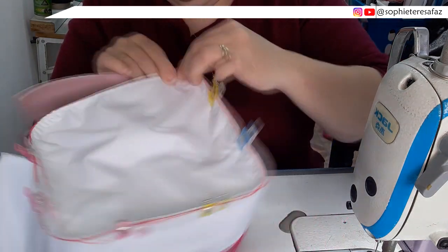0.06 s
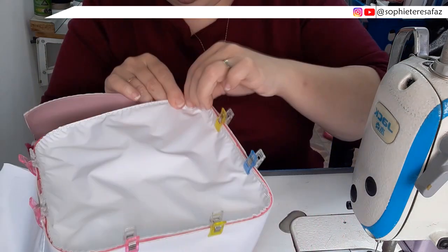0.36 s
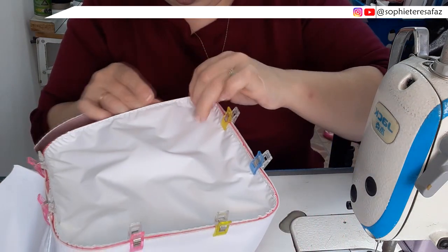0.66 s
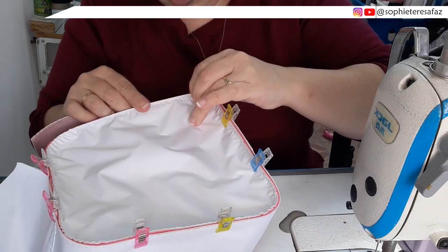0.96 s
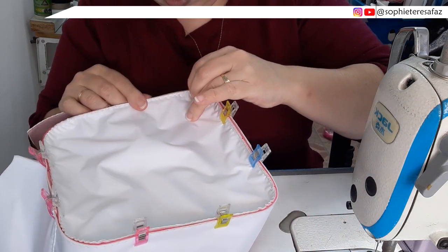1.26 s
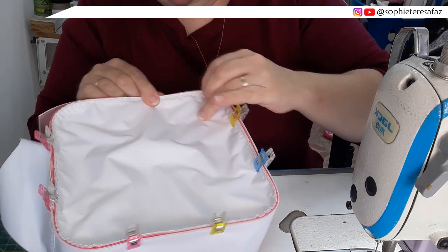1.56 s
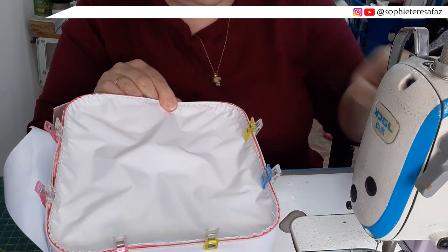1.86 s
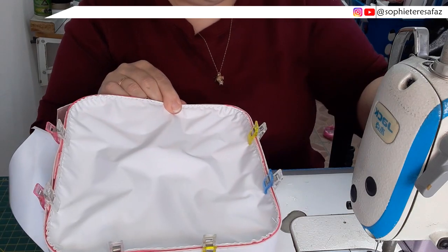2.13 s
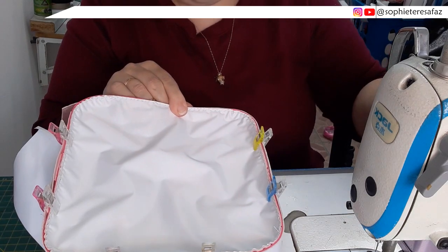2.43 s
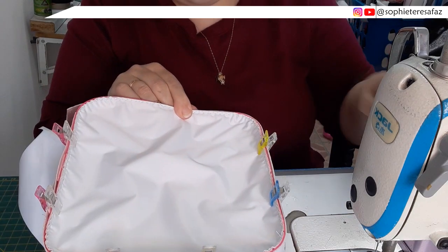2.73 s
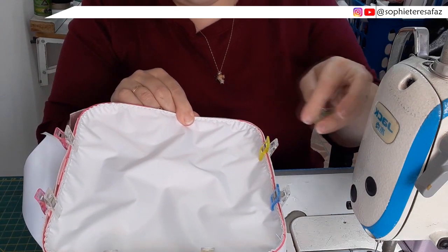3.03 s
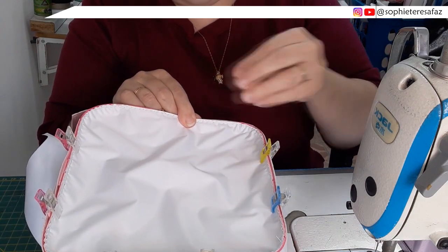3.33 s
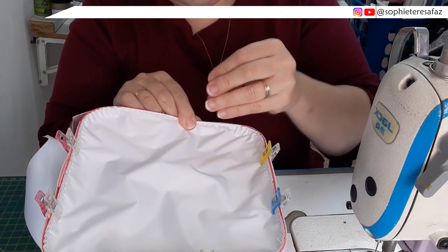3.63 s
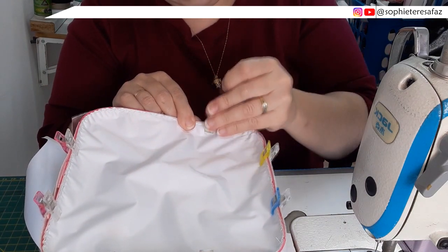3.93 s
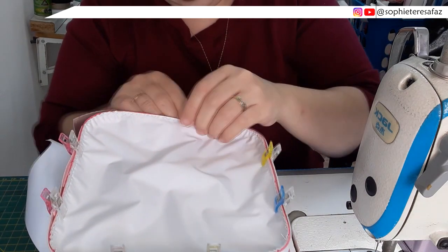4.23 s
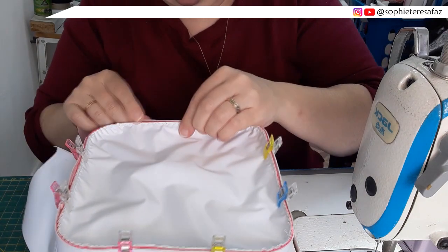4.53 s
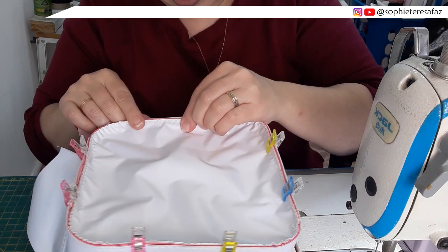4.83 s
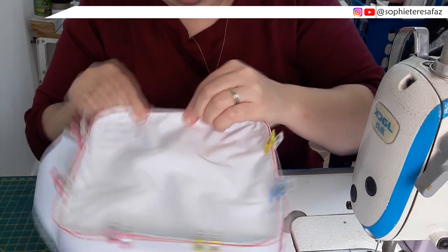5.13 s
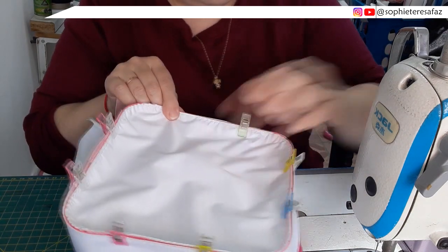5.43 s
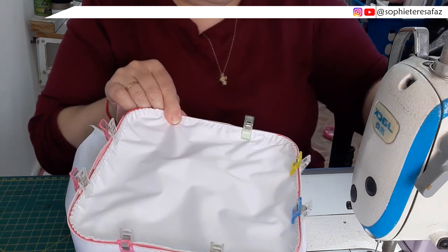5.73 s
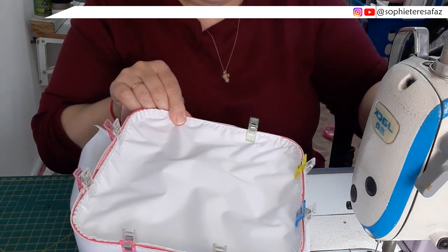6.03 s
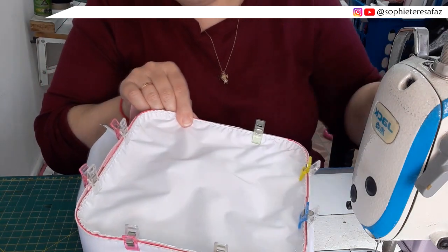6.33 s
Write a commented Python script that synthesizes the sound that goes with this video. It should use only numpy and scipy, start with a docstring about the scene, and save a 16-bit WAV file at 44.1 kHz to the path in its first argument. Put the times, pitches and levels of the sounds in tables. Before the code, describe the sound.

Stiff synthetic lining is pushed into a bag, starting with a loud crinkle and a cluster of sharp snaps in the first 0.3 seconds as taut panels flip over. Softer sliding, small crackles and dull finger scuffs continue until about 2 seconds. From 2 to 2.6 seconds a hand rummages in a tub of small plastic clips, making light, dry clicks and rattles. Faint rubbing follows, then more rustles and scuffs from about 4 seconds, growing into a crinkly flurry between 5.1 and 5.4 seconds. The clips rattle again from 5.6 to about 6.3 seconds. Underneath runs a low room rumble with a few soft swelling drones and a faint hum, a little stronger between 1 and 3 seconds. The workshop is small, with a brief ring. The stereo microphone is near the work, and everything sits slightly to the right.

```python
"""Lining a bag at the sewing table

A small workshop, with a stereo microphone near the work and everything a little to its right. Stiff synthetic
lining is pushed into a bag: the cloth slides and crinkles, taut panels snap over, and early on a couple of
clips knock on the table. Twice a hand rummages at the side, most likely in a tub of small plastic sewing clips.
The room answers briefly, over a low rumble, a few swelling low notes and a faint hum."""
import sys
import numpy as np
from scipy import signal
from scipy.fft import rfft, irfft
from scipy.io import wavfile
from scipy.ndimage import uniform_filter1d

SR = 44100
rng = np.random.default_rng(int(sys.argv[2]) if len(sys.argv) > 2 else 0)


def digitize_waveform(pressure):
    """Quantize a signal to 16-bit integers and store it at the path in sys.argv[1].

    Rows of a 2-D input are taken as channels; values are limited to [-1, 1].
    """
    field = np.atleast_2d(pressure).T
    bounded = np.clip(field, -1, 1)
    quanta = np.round(bounded * 32767).astype(np.int16)
    wavfile.write(sys.argv[1], SR, quanta)


N = 281358
TIME = np.arange(N) / SR

# Likeness of the microphone's two ports. Each row: frequency in Hz, correlation.
PORT_CORRELATION = [(60, 1), (200, 0.97), (400, 0.64), (800, 0.54), (1500, 0.082), (3000, 0.0067),
                    (16000, 0)]
# The workshop's ring. Each row: frequency in Hz, seconds to die away by 60 dB.
WORKSHOP_T60 = [(200, 0.72), (530, 0.33), (1400, 0.26), (3700, 0.24), (9700, 0.24), (16000, 0.2)]

# Colours of the room tone. Each row: frequency in Hz, relative level in dB.
RUMBLE_COLOUR = [(20, -38), (34, -9.5), (48, -2.5), (70, -7.5), (86, 1), (105, -2.5), (135, -1),
                 (165, -4.5), (205, -3.5), (255, -15.5), (330, -8), (450, -29.5), (1500, -52.5)]
AIR_COLOUR = [(30, -10.5), (200, 1.5), (360, 1.5), (500, -3), (750, -7), (1100, -20.5), (1550, -17),
              (2200, -27), (4000, -31), (7000, -40), (9000, -25), (10500, -32.5), (16000, -35)]
# How rumble and hum swell and ease. Each row: time in seconds, relative level in dB.
RUMBLE_CURVE = [(0, -57.5), (2.3, -54), (3.8, -58.5), (4.9, -57), (5.7, -53.5), (6.38, -54.5)]
HUM_CURVE = [(0, -69), (.55, -67.5), (1.1, -55.5), (2.27, -52.5), (2.45, -59), (2.85, -55.5), (3.3, -68.5),
             (6.38, -65)]
# Lines of the hum. Each row: pitch in Hz, waver in Hz, relative level in dB.
HUM_LINES = [(53.2, 2.1, 0), (367, 4, -22), (585, 3.4, -23.5)]

# Cloth drawn over cloth. Each row: peak time and length in seconds, relative rub level in dB,
# then the rustle of the folds and the fizz of the weave as offsets from it in dB.
CLOTH_STROKES = [(.005, 0.1, -48, 1.5, 1), (0.094, 0.086, -55, 1, -14), (0.233, 0.076, -51, 2.5, -5),
                 (.33, 0.18, -65, -3.5, -7.5), (0.5, 0.13, -70.5, -6, -7), (0.573, 0.21, -82.5, 5, 11),
                 (.71, 0.028, -71, 5, 9), (0.758, .12, -64.5, -1.5, -7), (0.985, .2, -80, -16, -11),
                 (1.144, 0.028, -76.5, -11, -2.5), (1.19, 0.21, -71, -17, -8),
                 (1.255, 0.18, -70.5, -7, -12), (1.44, 0.48, -73, -5.5, -8.5), (1.611, 0.12, -67, 4.5, 0),
                 (1.885, 0.19, -72.5, -9, -7), (2.677, 0.057, -73, -5, 1.5), (2.76, 0.68, -74, -10.5, -8.5),
                 (3.2, 0.44, -91, -6, -2), (3.502, .1, -84, -7.5, -2.5), (3.682, 0.073, -80, -9, -4),
                 (3.883, 0.046, -78, 0.5, 4), (3.982, 0.12, -67, -5, -2.5), (4.097, 0.18, -71, -5, -3),
                 (4.192, 0.15, -71, -3.5, 2.5), (4.36, .12, -66.5, -2.5, 1.5), (4.644, 0.26, -71, -7, -6),
                 (4.84, 0.56, -77.5, -11, -6), (5.146, 0.12, -62, 4, 3.5), (5.206, 0.087, -63.5, 1, -0.5),
                 (5.299, 0.075, -62.5, 2.5, -0.5), (5.37, 0.14, -59.5, -2, -3.5),
                 (5.61, 0.25, -70.5, -10, -5)]
# A seam zipping over the weave. Each row: peak time and length in seconds, relative level in dB.
SEAM_ZIPS = [(.113, 0.013, -60.5), (0.124, 0.011, -48.5)]
# Fingers dragging on the bag. Each row: peak time and length in seconds, relative level in dB.
FINGER_PRESSES = [(.01, 0.21, -52), (.235, 0.098, -50), (0.472, 0.11, -59), (0.79, 0.1, -61),
                  (1.207, 0.15, -60.5), (1.32, 0.088, -56), (1.553, 0.29, -61.5), (1.9, .25, -70.5),
                  (2.3, 0.29, -60), (2.78, 0.28, -62), (3.12, 0.19, -69.5), (4.008, .1, -52),
                  (4.18, 0.092, -53.5), (4.348, .12, -61.5), (4.62, 0.58, -70.5), (5.117, 0.12, -49),
                  (5.341, 0.12, -48)]
# Sharp clicks: mostly panels snapping, but the loud ones near 0.21 s and 0.23 s are clips knocking on the
# table. # Each row: time in seconds, relative strength in dB, the thud's offset in dB.
SNAPS = [(.0092, -8.5, -6), (0.025, -18.5, 6.5), (0.0932, -19.5, -13), (0.206, -3.5, -14),
         (0.213, -17, 9.5), (0.2313, -6, -2.5), (.2375, -14, 0), (.244, -12, -6), (.251, -14, -21),
         (0.264, -11.5, -22), (0.696, -30.5, -14), (0.735, -31, -15), (1.5853, -29, 1),
         (3.979, -36.5, 17.5), (4.0179, -26, -2), (4.208, -34, -9), (5.138, -37, 8), (5.345, -26, 2)]
# The panel's resonances. Each row: frequency and width in Hz, strength in dB against its colour.
PANEL_RESONANCES = [(1260, 240, 4), (2018, 151, -1.5), (2540, 230, 0), (3380, 260, 4.5), (5050, 400, -8.5)]
# Colours of lining and bag. Each row: frequency in Hz, relative level in dB.
RUB_COLOUR = [(150, -33), (500, 4), (750, 6), (950, 2), (1300, 3), (2000, -2), (3000, -8.5), (5000, -31.5),
              (16000, -61)]
FOLD_COLOUR = [(600, -8), (1800, 6), (2600, 6), (3500, 4), (5000, -3), (6500, -7), (10000, -19.5),
               (16000, -42)]
WEAVE_COLOUR = [(1000, -25), (3500, -38), (5500, 4.5), (7500, 5), (9000, 9.5), (10200, 3), (13000, 6),
                (16000, -1)]
SEAM_COLOUR = [(2000, -30), (8000, -12.5), (9500, 1.5), (11000, 0), (13500, -0.5), (16000, -3)]
SCUFF_COLOUR = [(100, -38.5), (250, -10), (360, 0), (560, -4.5), (720, -8.5), (950, -27.5), (2000, -33),
                (8000, -59.5)]
PANEL_COLOUR = [(100, -22), (300, -6.5), (650, 2), (1000, 1.5), (3000, -0.5), (5000, -0.5), (7000, -6.5),
                (10000, -13.5), (13000, -10.5), (16000, -19.5)]
THUD_COLOUR = [(60, -5), (170, -10.5), (260, 0), (350, 8), (470, -5.5), (660, 2.5), (950, -21.5),
               (3000, -40), (9000, -66)]

# Notes in the rumble. Each row: peak time and length in seconds, pitch in Hz, relative level in dB.
LOW_NOTES = [(0.402, .4, 205.2, -59.5), (0.867, 0.28, 205, -62.5), (1.21, 0.35, 205.8, -60),
             (1.68, 0.2, 206.7, -60), (2.4, 0.055, 88, -51.5), (2.597, .3, 171, -58.5),
             (4.49, 0.19, 134, -57.5), (5.603, 0.28, 172.8, -55.5), (6.24, 0.55, 84.5, -56.5)]

# The hand in the clips. Each row: start and length in seconds, relative level in dB, glint offset in dB.
CLIP_STIRS = [(2.008, 0.073, -57.5, 6), (2.048, 0.081, -43.5, -6), (2.119, 0.056, -41, -3.5),
              (2.207, 0.075, -46.5, -2.5), (2.3, 0.038, -48, -2), (2.357, 0.033, -50, -6),
              (2.464, 0.068, -43.5, -5.5), (5.656, 0.12, -45, -5), (5.803, 0.066, -50, -5.5),
              (5.896, 0.038, -50, -5.5), (5.946, 0.034, -58, -0.5), (6.043, 0.1, -54.5, -4),
              (6.127, 0.041, -52.5, -4), (6.187, 0.026, -43.5, -5), (6.25, 0.065, -70, -5)]
# A heap of clips tumbling. Each row: start in seconds, relative strength in dB, length in seconds,
# glint offset in dB.
CLIP_TUMBLES = [(2.035, -40, 0.012, 9), (2.063, -14.5, 0.018, 2), (2.072, -17, .014, 5.5),
                (2.137, -14.5, 0.017, 3), (2.165, -23, 0.0035, 4), (2.235, -18, 0.012, 0),
                (2.3116, -7.5, 0.0018, -3.5), (2.3675, -6, 0.012, -4.5), (2.4682, -6, 0.0033, -8),
                (2.472, -6.5, 0.0042, -3), (2.478, -8.5, .005, -8), (2.515, -10, 0.0094, -10),
                (2.528, -10.5, 0.01, 0), (5.626, -19, 0.014, -14), (5.6611, -6.5, 0.0099, 0),
                (5.686, -7.5, 0.011, -4.5), (5.742, -18, 0.0051, 1), (5.828, -22, 0.0051, 3),
                (5.842, -14, .008, -4), (5.881, -28.5, 0.0042, 11.5), (5.924, -15.5, .014, -7),
                (6.013, -20, 0.0033, -29), (6.048, -18.5, 0.0048, -10), (6.0877, -19, 0.014, 1),
                (6.139, -15, .008, -4), (6.1974, -8, .004, -9), (6.2055, -10.5, 0.0065, 2)]
# The tub's resonances. Each row: frequency and width in Hz, strength in dB against its colour.
TUB_RESONANCES = [(320, 55, 15.5), (1026, 150, 6.5), (1490, 38, -13), (1587, 130, 6), (1686, 99, 5),
                  (2150, 130, -1.5), (2420, 80, -9.5), (3480, 250, -1)]
# Colours of clip on tub and clip on clip. Each row: frequency in Hz, relative level in dB.
KNOCK_COLOUR = [(80, -13.5), (250, -10.5), (550, -6.5), (720, -1.5), (900, -0.5), (1300, -4), (2500, -1),
                (3600, -3.5), (4500, -8.5), (6500, -5.5), (10000, -19), (16000, -17)]
GLINT_COLOUR = [(500, -20), (2500, 1), (5000, -0.5), (7000, -4), (9000, 1.5), (10200, -2.5), (12000, 2),
                (13500, -2.5), (16000, -4)]


def amp(db):
    """Decibels to gain."""
    return 10 ** (np.asarray(db) / 20)


def unit(x):
    """Scales to rms 1."""
    return x / np.sqrt(np.mean(x ** 2) + 1e-20)


def value_at(points, hz):
    """Reads a curve on a log-frequency axis."""
    f, value = np.transpose(points)
    return np.interp(np.log(hz + 1), np.log(f + 1), value)


def level(curve):
    """Gain that follows a dB curve and is silent outside it."""
    s, db = np.transpose(curve)
    return uniform_filter1d(amp(np.interp(TIME, s, db)) * (TIME >= s[0]) * (TIME <= s[-1]), size=300)


def wander(pace_s):
    """Slow random drift with a new value every pace_s."""
    values = rng.standard_normal(1000)
    return np.interp(TIME / pace_s, np.arange(len(values)), values)


def convolve(x, response):
    """Filters each channel and keeps the scene's length."""
    return signal.oaconvolve(np.atleast_2d(x), np.atleast_2d(response), axes=1)[:, :N]


def colour(x, points, modes=(), size=8192):
    """Causal filter of energy 1: a broad spectrum with resonances standing on it."""
    hz = np.fft.rfftfreq(size, 1 / SR)
    peaks = 1 + sum(amp(db) ** 2 / (1 + (2 * (hz - f) / width) ** 2) for f, width, db in modes)
    cepstrum = irfft(np.log(amp(value_at(points, hz)) * np.sqrt(peaks)))
    cepstrum[1:size // 2] *= 2  # folded for minimum phase
    cepstrum[size // 2 + 1:] = 0
    response = irfft(np.exp(rfft(cepstrum)))[:size // 2]
    return convolve(x, response / np.linalg.norm(response))


def at_ports(x):
    """Makes two unrelated channels alike in the bass, as at two closely spaced microphone ports."""
    a, b = rfft(x)
    correlation = np.clip(value_at(PORT_CORRELATION, np.fft.rfftfreq(x.shape[1], 1 / SR)), 0, 1)
    turn = np.arccos(correlation) / 2
    mid, side = a * np.cos(turn), b * np.sin(turn)
    return irfft(np.array([mid + side, mid - side]), x.shape[1])


def noise():
    """White noise at the two ports."""
    return at_ports(rng.standard_normal((2, N)))


def grains(per_s, spread_db):
    """Random tiny impacts, mostly small and a few large, of steady mean power."""
    size = amp(spread_db * np.minimum(rng.exponential(1, N), 4))
    train = size * rng.choice([-1, 1], N) * (rng.random(N) < per_s / SR)
    return train / np.sqrt(abs(uniform_filter1d(train ** 2, size=1500)) + 1e-3)


def scatter(train, ring_s, count=16):
    """Each impact takes one of several contact points, each with its own brief ring at each port."""
    t = np.arange(400) / SR
    decay = np.exp(-t / ring_s)
    rings = np.array([at_ports(rng.standard_normal((2, len(t))) * decay) for _ in range(count)])
    rings /= np.linalg.norm(rings, axis=2, keepdims=True)
    point, out = rng.integers(0, count, N), np.zeros((2, N + len(t)))
    for at in np.flatnonzero(train):
        out[:, at:at + len(t)] += train[at] * rings[point[at]]
    return out[:, :N]


def swell(peak, length, rise_share=0.47, roundness=1.4):
    """Gain that rises to a rounded top and dies away, as when a hand speeds up and slows to rest."""
    away = np.maximum((peak - TIME) / rise_share, (TIME - peak) / (1 - rise_share)) / length
    return np.exp(-np.minimum(away ** roundness, 30))


def together(shapes, db):
    """Overlapping gestures, each at its own level, add in power."""
    return np.sqrt(amp(db) ** 2 @ np.square(shapes))


def drift(x, depth_db, span_frames=9, span_bins=9):
    """Patches of the spectrum swell and sink at random."""
    spectra = signal.stft(x, SR, nperseg=512)[2]
    patches = uniform_filter1d(rng.standard_normal(spectra.shape[1:]), span_bins, axis=0)
    patches = unit(uniform_filter1d(patches, span_frames, axis=1))
    return signal.istft(spectra * unit(amp(depth_db * patches)), SR, nperseg=512)[1][:, :N]


def reflections(x, near_db, tail_db, near_s=0.003):
    """What comes back to the microphone: quick echoes off table and machine, then the room's tail."""
    t = np.arange(SR // 2) / SR
    taps = rng.standard_normal((2, len(t))) * (rng.random((2, len(t))) < .15) * (t > .0008)
    near = at_ports(taps * np.exp(-t / near_s))
    diffuse = at_ports(rng.standard_normal((2, len(t))) * (t > .005))
    hz, when, spectra = signal.stft(diffuse, SR, nperseg=256)
    decay = amp(-60 * when / value_at(WORKSHOP_T60, hz)[:, None])
    tail = signal.istft(spectra * decay, SR, nperseg=256)[1][:, :len(t)]
    echoes = amp(near_db) * near / np.linalg.norm(near[0]) + amp(tail_db) * tail / np.linalg.norm(tail[0])
    return convolve(x, echoes)


def in_workshop(x, near_db, tail_db, turns_per_s=3, count=3):
    """Direct sound plus reflections whose pattern keeps changing as the hand moves."""
    echoes = np.zeros((2, N))
    for k in range(count):
        share = np.sqrt(2 / count) * np.cos(np.pi * (turns_per_s * TIME + k / count))  # squares sum to 1
        echoes += reflections(x * share, near_db, tail_db)
    return x + echoes


def wavering_tone(hz, waver_hz, pace_s):
    """A sine of rms 1 whose pitch wanders."""
    pitch = hz + waver_hz * wander(pace_s)
    return np.sqrt(2) * np.sin(2 * np.pi * np.cumsum(pitch) / SR)


def room_tone(wander_db=2.35, pace_s=.09):
    """The rumble of table and room and a hum, both unsteady in level, with faint steady air."""
    rumble = amp(-2.5) * unit(colour(noise(), RUMBLE_COLOUR)) * level(RUMBLE_CURVE)
    rumble *= amp(wander_db * wander(pace_s))
    air = amp(-68) * unit(colour(noise(), AIR_COLOUR))
    hum = sum(amp(db) * wavering_tone(hz, waver_hz, pace_s=.07) for hz, waver_hz, db in HUM_LINES)
    hum *= amp(-2) * level(HUM_CURVE) * amp(wander_db * wander(pace_s))
    return rumble + air + hum


def sliding_cloth():
    """Threads catch and slip in a dense crackle: cloth rubs, folds rustle, weave fizzes, a seam zips."""
    rub_db, rustle_db, fizz_db = np.transpose(CLOTH_STROKES)[2:]
    strokes = [swell(peak, length) for peak, length, *_ in CLOTH_STROKES]
    zipping = sum(amp(db) * np.exp(-(2 * (TIME - peak) / length) ** 2) for peak, length, db in SEAM_ZIPS)
    slips = unit(scatter(grains(per_s=1800, spread_db=2.5), ring_s=.0004) + amp(-2.5) * noise())
    rub = amp(1) * colour(slips * together(strokes, rub_db), RUB_COLOUR)
    rustle = amp(2.5) * colour(slips * together(strokes, rub_db + rustle_db), FOLD_COLOUR)
    fizz = amp(1.5) * colour(slips * together(strokes, rub_db + fizz_db), WEAVE_COLOUR)
    seam = colour(slips * zipping, SEAM_COLOUR)
    return rub + rustle + fizz + seam


def bag_scuff():
    """Fingers press and drag on the hollow bag, which answers with a dull scuff."""
    presses = [swell(peak, length) for peak, length, _ in FINGER_PRESSES]
    pressure = together(presses, db=np.transpose(FINGER_PRESSES)[2])
    friction = scatter(grains(per_s=650, spread_db=2), ring_s=0.0007)
    return amp(-4) * colour(friction * pressure, SCUFF_COLOUR)


def panel_snaps(settle_s=0.0034):
    """A taut panel flips over, or a clip knocks on the table: a sharp crack, a crunch of small folds after it,
    and a thud of the bag."""
    crack, thud = np.zeros(N), np.zeros((2, N))
    for s, db, thud_db in SNAPS:
        crack[round(s * SR)] -= amp(db)
        thud[:, round(s * SR)] -= amp(db + thud_db)
    pole = np.exp(-1 / (settle_s * SR))  # spreads each crack's energy in time
    settling = np.sqrt(signal.lfilter([1 - pole], [1, -pole], crack ** 2 + 1e-20))
    crunch = amp(-8) * settling * grains(per_s=2000, spread_db=3)
    crinkle = amp(-12.5) * crack + scatter(amp(-5) * crack + crunch, ring_s=0.0011)
    return amp(-2) * colour(crinkle, PANEL_COLOUR, PANEL_RESONANCES) + amp(-9) * colour(thud, THUD_COLOUR)


def low_notes():
    """Each low note swells out of the rumble, wavers a little and fades."""
    return sum(amp(db) * swell(peak, length) * wavering_tone(hz, waver_hz=2.5, pace_s=.05)
               for peak, length, hz, db in LOW_NOTES)


def stir(start, length, rise_s=0.021, settle_db_per_s=330):
    """Gain of one stir: the heap starts to move quickly and settles once the hand stops."""
    rise = np.clip((TIME - start) / rise_s, 0, 1) ** 2
    return rise * amp(-settle_db_per_s * np.clip(TIME - start - length, 0, 1))


def clip_ticks(train, low_hz, high_hz, ring_s, ring_db, clip_count=48, mode_count=5):
    """Each impact strikes one of many clips: a dry tick plus that clip's own few short modes."""
    t = np.arange(1500) / SR
    struck, out = rng.integers(0, clip_count, N), np.zeros((2, N + len(t)))
    hits = np.flatnonzero(train)
    for clip in range(clip_count):
        hz = low_hz * (high_hz / low_hz) ** rng.random((mode_count, 1))
        phase = rng.random((2, mode_count, 1))
        modes = np.sin(2 * np.pi * (hz * t + phase)).sum(1) * np.exp(-t / ring_s)
        tick = at_ports(rng.standard_normal((2, len(t))) * np.exp(-t / 0.001))
        sound = unit(unit(tick) + amp(ring_db) * unit(modes)) / np.sqrt(len(t))
        for at in hits[struck[hits] == clip]:
            out[:, at:at + len(t)] += train[at] * sound
    return out[:, :N]


def tub_of_clips(tumble_ticks=7):
    """Light plastic clips knock on the tub and glint against each other, in stirs and sudden tumbles."""
    stirs = [stir(start, length) for start, length, *_ in CLIP_STIRS]
    stir_db, glint_db = np.transpose(CLIP_STIRS)[2:]
    impacts = grains(per_s=1150, spread_db=2.5)
    knocks = amp(-2) * impacts * together(stirs, stir_db)
    glints = impacts * together(stirs, stir_db + glint_db)
    for start, db, length, glint_offset_db in CLIP_TUMBLES:
        jitter = rng.random(tumble_ticks)
        late = (np.arange(tumble_ticks) + jitter - jitter[0]) / tumble_ticks
        size = np.exp(-.7 * late)  # the first tick is on time, later ones are weaker
        size *= amp(db) / np.linalg.norm(size)
        at = np.round((start + length * late) * SR).astype(int)
        knocks[at] += amp(-7) * size
        glints[at] += amp(-5 + glint_offset_db) * size
    tub = clip_ticks(knocks, low_hz=1198, high_hz=4854, ring_s=0.0029, ring_db=-7.5)
    plastic = clip_ticks(glints, low_hz=5010, high_hz=14060, ring_s=0.002, ring_db=-3.5)
    tub = drift(colour(tub, KNOCK_COLOUR, TUB_RESONANCES), depth_db=1.45, span_frames=7, span_bins=4)
    plastic = drift(colour(plastic, GLINT_COLOUR), depth_db=2.2, span_frames=6, span_bins=10)
    return tub + plastic


def to_right(x, db):
    """Makes the right channel louder than the left by db."""
    return x * amp([[-db / 2], [db / 2]])


def scene():
    """The table as the microphone hears it, with everything somewhat to the right."""
    cloth, scuff = sliding_cloth(), bag_scuff()
    cloth = drift(cloth, depth_db=2)  # folds open and close
    fabric = in_workshop(cloth + scuff, near_db=-3, tail_db=-6)
    snaps = in_workshop(panel_snaps(), near_db=-9.5, tail_db=-4)
    clips = in_workshop(tub_of_clips(), near_db=-4, tail_db=-5.5)
    background = room_tone() + low_notes()
    return to_right(fabric, 4) + to_right(snaps, 2) + to_right(clips, 3.5) + to_right(background, 5.5)


def record(dry):
    """The recorder's band limit cuts off the highest treble."""
    edge_hz = 16050
    lowpass = signal.firwin(401, edge_hz, window=("kaiser", 8), fs=SR)
    return signal.oaconvolve(dry, lowpass[None], "same", axes=1)


dry = scene()
out = record(dry)
digitize_waveform(out)
```